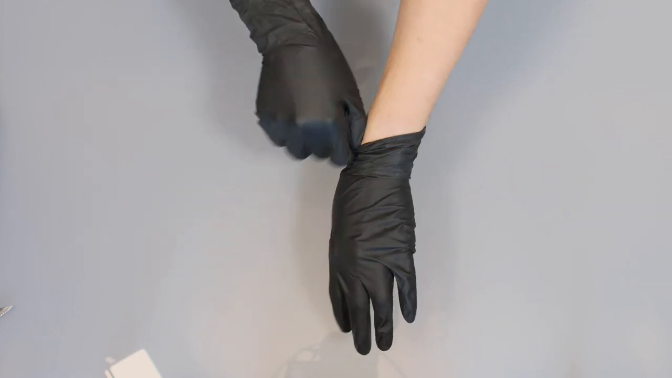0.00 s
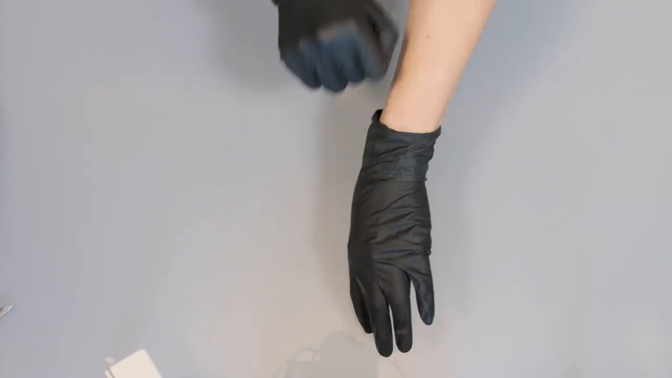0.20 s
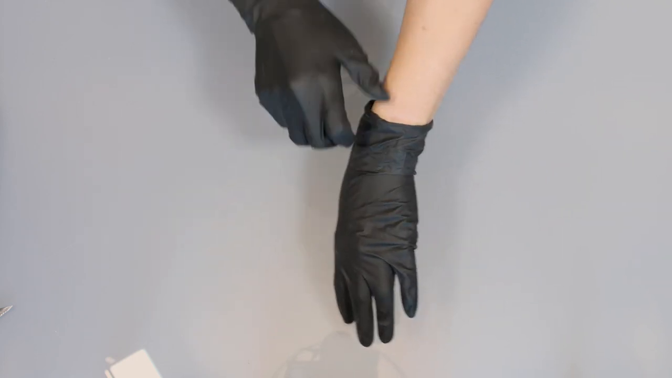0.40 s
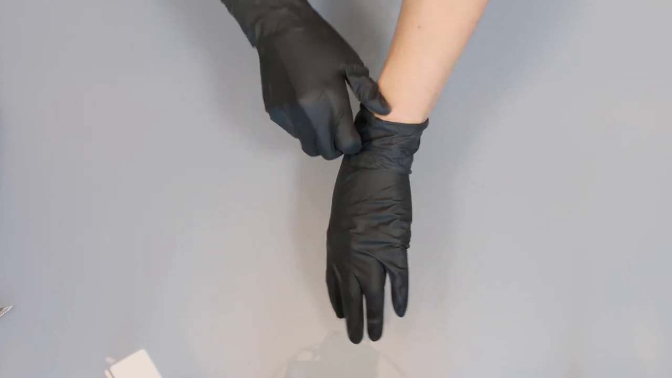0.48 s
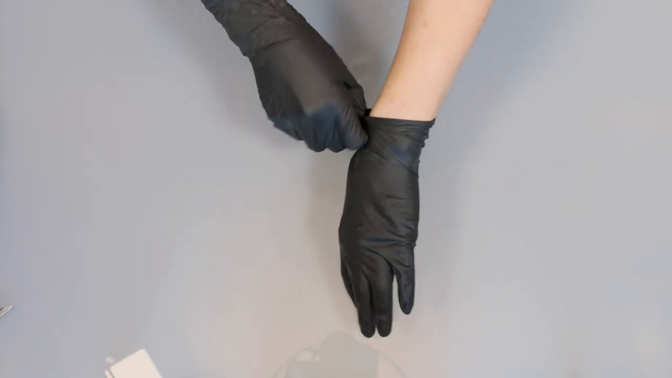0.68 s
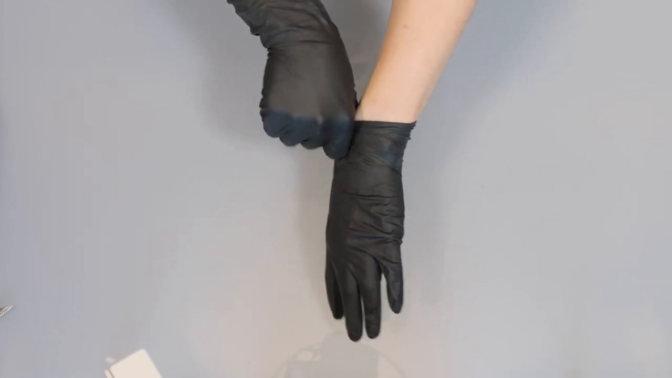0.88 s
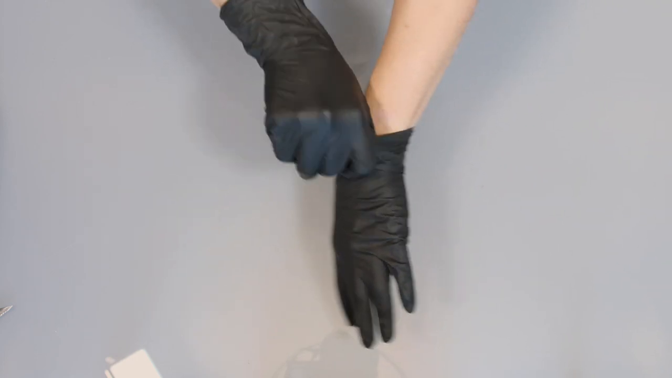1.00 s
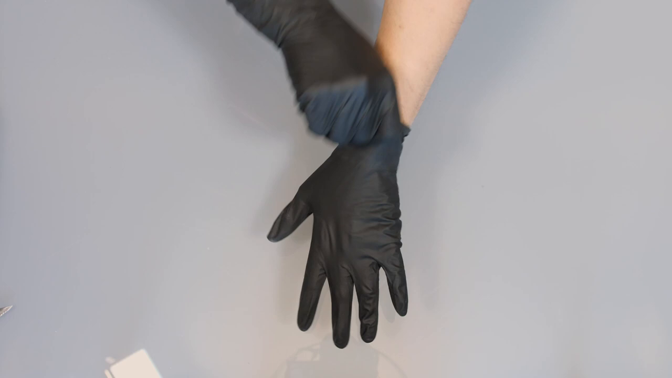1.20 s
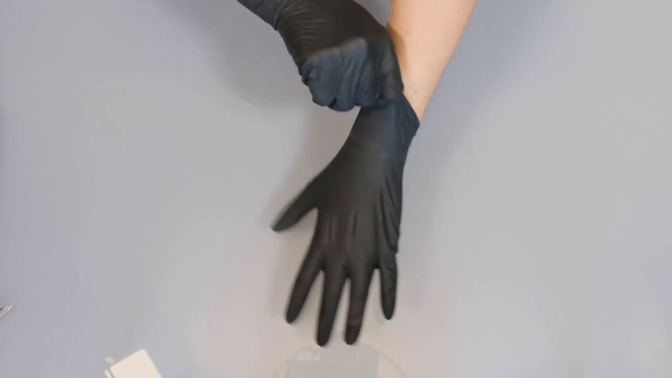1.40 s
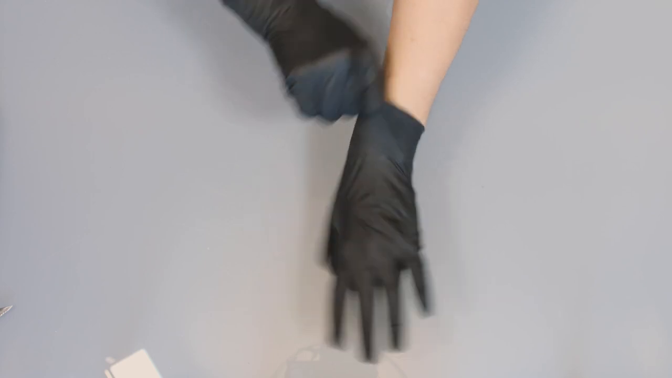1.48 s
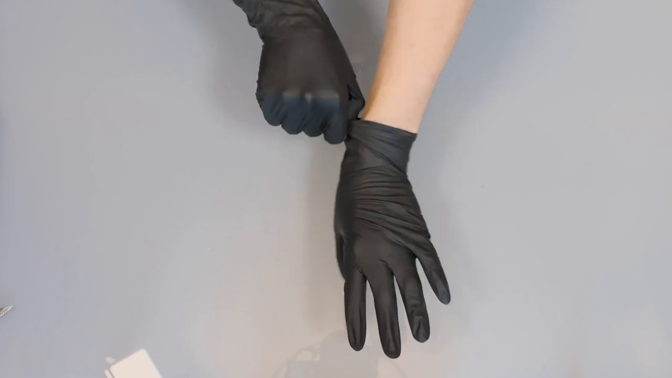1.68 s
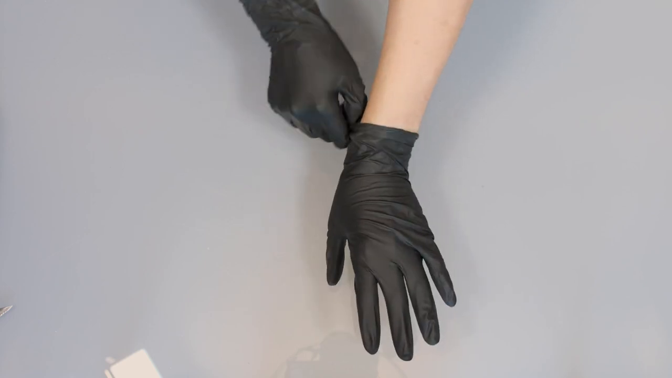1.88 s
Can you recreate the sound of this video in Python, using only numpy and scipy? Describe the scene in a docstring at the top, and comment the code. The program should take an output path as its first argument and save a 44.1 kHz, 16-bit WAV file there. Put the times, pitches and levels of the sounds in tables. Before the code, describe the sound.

Thin rubber gloves being adjusted, close and dry, nearly mono in a small quiet room. Light crinkling leads to a sharp cuff slap with a soft thump at 0.24 s. Rustling fades almost away around 0.5 s; a crisp rustle comes at 0.68. Snaps cluster at 1.02-1.13, crackles and tiny squeals peak near 1.45, a bright snap at 1.6 starts a falling rubber stutter until 1.75, then a last rustle at 1.83.

```python
"""Rubber gloves at close range

Thin rubber gloves worked over the fingers, close to a nearly mono microphone in a small room.
Noise and random clicks, shaped by spectra, make the rustling, crackling film and the room air.
Damped sines make the rest: a cuff slaps the wrist, folds snap, taut film squeals, rubber stutters
on rubber, soft bumps reach the microphone. An 18 Hz sine is its stand swaying."""
import sys
import numpy as np
from scipy import signal
from scipy.fft import rfft, irfft, next_fast_len
from scipy.io import wavfile
from scipy.ndimage import uniform_filter1d, map_coordinates

SR = 44100
rng = np.random.default_rng(int(sys.argv[2]) if len(sys.argv) > 2 else 0)


def master_out(mix):
    """Clip the mix to full scale and print it as 16-bit PCM to the path in sys.argv[1]."""
    frames = np.transpose(np.atleast_2d(mix))
    ceiling = np.clip(frames, -1, 1)
    pcm = np.round(ceiling * 32767).astype(np.int16)
    wavfile.write(sys.argv[1], SR, pcm)


def boost(x):
    """Linear amplitude factor 10**(x/20) for a level x in decibels (scalar or array-like)."""
    u = np.asarray(x, float) / 20
    return 10 ** u


N = 85995  # samples


def unit(x):
    """Scaled to rms 1."""
    return x / np.sqrt(np.mean(x ** 2) + 1e-20)


def along(points, hz):
    """Values at hz from (Hz, value) points on a log frequency axis."""
    f, v = np.transpose(points)
    return np.interp(np.log(hz + 1), np.log(f + 1), v)


def curves(rows):
    """One value per sample for each column after the time."""
    s, *columns = np.transpose(rows)
    return [np.interp(np.arange(N) / SR, s, column) for column in columns]


def wobble(rate):
    """A smooth random curve with rate knots a second."""
    knots = rng.standard_normal(int(N * rate / SR) + 4)
    return map_coordinates(knots, [np.arange(N) * rate / SR])


def coloured(x, points):
    """x filtered through a (Hz, dB) spectrum."""
    m = next_fast_len(N + 8192)
    gain = boost(along(points, np.fft.rfftfreq(m, 1 / SR)))
    return irfft(rfft(x, m) * gain, m)[:N]


def high_pass(x, hz):
    """Second-order cut of everything below hz."""
    return signal.sosfilt(signal.butter(2, hz, "high", fs=SR, output="sos"), x)


def pings(s, gain, hz, life_s, size):
    """Damped sines with a soft start, one per row; the decay falls to 1/e in life_s."""
    t = np.arange(size) / SR
    age = t / life_s[:, None]
    envelope = np.exp(-age) * (1 - np.exp(-age / 0.12))  # attack constant: 0.12 of the life
    wave = gain[:, None] * np.sin(2 * np.pi * hz[:, None] * t) * envelope
    at = np.round(s * SR).astype(int)[:, None] + np.arange(size)
    return np.bincount(at.ravel(), wave.ravel(), N + size + SR)[:N]


def crackle(count, spread_db, hiss):
    """Random tiny buckles of uneven size on a bed of friction hiss, rms 1."""
    u = rng.random((count, 3))
    at = (u[:, 0] * N).astype(int)
    size = boost(-spread_db * np.log(1.004 - u[:, 2]))
    clicks = np.bincount(at, np.sign(u[:, 1] - .5) * size, N)
    return unit(unit(clicks) + hiss * rng.standard_normal(N))


# Spectrum of the room air: f/Hz, level/dB (per Hz, relative)
AIR_SPECTRUM = [(20, 10), (90, -4.5), (300, -2.5), (2000, -9), (15000, -18), (15800, -60)]


def room_air():
    """Steady noise of the quiet room, at -64.5 dB rms."""
    return boost(-64.5) * unit(coloured(rng.standard_normal(N), AIR_SPECTRUM))


# How long the small room rings: f/Hz, t/s (fall by 60 dB)
ROOM_DECAY = [(300, 0.38), (2500, 0.42), (12000, 0.067)]


def room(x):
    """Each frequency of the answer dies at its own speed; fast random wobble roughens what feeds the tail."""
    hz, t, z = signal.stft(rng.standard_normal(SR // 2), SR, nperseg=256)
    fall = boost(-60 * t / along(ROOM_DECAY, hz)[:, None])
    tail = signal.istft(z * fall, SR, nperseg=256)[1]
    roughened = x * (1 + wobble(1200)) / np.sqrt(2)
    delayed = np.pad(roughened, (150, 0))  # samples before the walls answer
    return signal.fftconvolve(delayed, tail / np.linalg.norm(tail))[:N]


# Colouring of what differs between the channels: f/Hz, level/dB (relative)
SIDE_SPECTRUM = [(60, 2), (2500, 1.5), (6000, 2), (14000, 3.5), (15500, -15)]


def apart(mid):
    """A faint flickering hiss, opposite in the two channels, that partly follows the sound."""
    level_db, follows, flicker_db = -63, 0.49, 3.5  # rms; exponent on the sound's magnitude; depth
    z = np.abs(signal.stft(mid, nperseg=1024)[2])
    smooth = uniform_filter1d(rng.standard_normal(z.shape), size=20, axis=0)
    patches = unit(smooth + 0.52 * rng.standard_normal(z.shape[1]))
    phase = np.exp(2j * np.pi * rng.random(z.shape))
    z = z ** follows * boost(flicker_db * patches) * phase
    hiss = signal.istft(z, nperseg=1024)[1][:N]
    return boost(level_db) * unit(coloured(hiss, SIDE_SPECTRUM))


def sway():
    """The microphone stand is nudged, swings as a slow sine and settles."""
    start_s, rise_s, hold_s = .86, 0.059, 0.35
    level_db, fall_db_per_s, sway_hz = -39, 43, 18.2
    t = np.maximum(np.arange(N) / SR - start_s, 0)
    fall_db = fall_db_per_s * np.maximum(t - hold_s, 0)
    level = (1 - np.exp(-t / rise_s)) * boost(level_db - fall_db)
    return level * np.sin(2 * np.pi * sway_hz * t - 1.6)


# Soft bumps reaching the microphone: t/s, level/dB (before the smoothing), f/Hz
BUMP_HITS = [(0.166, -40, 174), (0.186, -32.5, 217), (.2388, -17.5, 298), (0.54, -42, 176),
             (0.853, -32, 217), (0.865, -36, 274), (0.899, -41.5, 171), (1.022, -37.5, 326),
             (1.262, -40.5, 113), (1.273, -39, 260), (1.305, -45, 125), (1.461, -37, 290),
             (1.598, -62, 870), (1.835, -33.5, 514)]


def bumps():
    """Low soft pushes, each a heavily damped sine with a shorter overtone."""
    s, db, hz = np.transpose(BUMP_HITS)
    life_s = 0.9 / hz  # 0.9 of a cycle
    push = pings(s, 1.9 * boost(db), hz, life_s, size=4000)
    overtone = pings(s, boost(db - 9.5), 2.06 * hz, life_s / 2, size=2000)
    return high_pass(uniform_filter1d(push + overtone, size=24), 70)


# Taut film squealing briefly: t/s, length t/s, level/dB (before a 7 dB lift and random spread), f/Hz (centre)
SQUEAL_RUNS = [(0.9005, .005, -44.5, 2090), (1.055, .011, -44, 2750), (1.443, .012, -36.5, 3390),
               (1.458, .011, -38, 3700)]


def squeals():
    """A quick run of random slips rings the stretched film at scattered pitches around a centre."""
    tries, slips_per_s, cycles = 40, 1100, 2.8  # cycles: life of each ping, at the centre pitch
    s, length, db, hz = np.repeat(np.array(SQUEAL_RUNS), repeats=tries, axis=0).T
    u = rng.random((len(s), 4))
    heard = u[:, 3] < slips_per_s * length / tries
    gain = heard * boost(db + 8.2 * u[:, 1] + 7)
    pitch_hz = hz * (1 + 0.32 * (u[:, 2] - .5))
    return pings(s + length * u[:, 0], gain, pitch_hz, cycles / hz, size=400)


# Rubber stuttering on rubber: t/s, hollow f/Hz, hollow level/dB, tick level/dB
# (levels before the lifts and random spread below)
STUTTER = [(1.39, 1300, -69.5, -76), (1.405, 1389, -48.5, -58), (1.45, 1496, -44, -52),
           (1.465, 1600, -70.5, -81), (1.598, 1150, -69, -70), (1.606, 1150, -46, -37),
           (1.635, 994, -38.5, -45.5), (1.657, 807.7, -38.5, -47), (1.675, 640, -37.5, -40.5),
           (1.70, 580.6, -39, -61), (1.72, 514, -40.5, -41), (1.755, 520, -65.5, -85)]


def squeak():
    """Uneven slips keep the gliding hollow of the glove ringing and tick near 2.6 kHz and above."""
    slips_per_s, tick_s, hollow_s = 345, .0003, .002  # lives of a high tick and of the hollow's ring
    palm_hz, waver = 450, .12  # a low note that wakes as the hollow sinks; both waver in pitch
    hollow_hz, hollow_db, tick_db = curves(STUTTER)
    slips = np.cumsum(slips_per_s * (1 + .16 * wobble(140))) / SR
    at = np.flatnonzero(np.diff(np.floor(slips)))
    at = at[hollow_db[at] > -69]
    u, s, life_s = rng.standard_normal((len(at), 4)), at / SR, np.full(len(at), tick_s)

    kicks = np.bincount(at, boost(hollow_db[at] + 4 + 3.7 * u[:, 0]), N)
    kicks = signal.lfilter([1], [1, -np.exp(-1 / SR / hollow_s)], kicks)
    hollow = np.sin(2 * np.pi * np.cumsum(hollow_hz * (1 + waver * wobble(300))) / SR)
    palm = np.sin(2 * np.pi * np.cumsum(palm_hz * (1 + waver * wobble(150))) / SR)
    rung = uniform_filter1d(kicks, size=24) * (hollow + palm_hz / hollow_hz * palm)

    tick = boost(tick_db[at] + 13.5 + 2 * u[:, 2])
    low = pings(s, tick, 2600 * (1 + 0.054 * u[:, 3]), 2 * life_s, size=200)
    high = pings(s, tick, 5200 * np.exp(0.34 * u[:, 1]), life_s, size=200)
    return high_pass(rung, 260) + low + high


# The cuff lands on the wrist in quick flaps: t/s, level/dB
FLAPS = [(.2389, -6.5), (.2411, -11), (.2424, -17.5), (.2439, -19)]
# Modes of the cuff: f/Hz, level/dB (added to the flap's), t/s (fall by 60 dB)
CUFF_MODES = [(800, -13, 0.0037), (1150, -10, 0.013), (1550, -9.5, 0.012), (2700, -0.5, 0.006),
              (3570, -2.5, 0.014), (5160, 1, 0.0024)]


def slap():
    """Every flap of the cuff rings the same short modes under a dry smack of noise."""
    smack_db, smack_s = -8, 0.0022  # relative to the flap; fall to 1/e
    rows = np.array([(s, db + level, hz, t60 / np.log(1000))
                     for s, db in FLAPS for hz, level, t60 in CUFF_MODES])
    s, db, hz, life_s = rows.T
    u, t = rng.standard_normal((len(rows), 2)), np.arange(N) / SR
    smack = sum(boost(level + smack_db) * (t >= at) * np.exp(-np.abs(t - at) / smack_s)
                for at, level in FLAPS)
    ring = pings(s + .0001 * u[:, 0], boost(db + u[:, 1]), hz, life_s, size=1200)
    return ring + smack * uniform_filter1d(rng.standard_normal(N), size=3)


# Folds snapping: t/s, level/dB (before the ping and crack gains), f/Hz
FOLDS = [(0.1563, -31, 8000), (0.1844, -20.5, 6400), (0.1863, -29, 2600), (0.1903, -30.5, 1330),
         (0.22, -33, 2900), (0.2326, -34, 4200), (0.538, -32, 6000), (0.5431, -31.5, 4230),
         (0.678, -20, 4460), (0.8212, -29, 2800), (1.0234, -30, 2600), (1.0334, -23.5, 3350),
         (1.0542, -24, 2700), (1.0702, -29.5, 1550), (1.074, -25, 2720), (1.0802, -25, 2940),
         (1.0869, -21, 2700), (1.0933, -17, 3000), (1.0992, -20.5, 2700), (1.1099, -43, 2200),
         (1.1275, -25.5, 5550), (1.139, -34, 1500), (1.2067, -21, 7760), (1.245, -33.5, 1630),
         (1.2791, -23.5, 2850), (1.3018, -24.5, 7300), (1.3704, -25, 2700), (1.3855, -37.5, 1140),
         (1.4568, -15.5, 3180), (1.4687, -31, 3280), (1.5565, -28.5, 1220), (1.5988, -10.5, 7700),
         (1.7594, -28, 5100)]


def snaps():
    """Each fold pops: a few cycles at its pitch and a dry crack of noise."""
    s, db, hz = np.transpose(FOLDS)
    t = np.arange(256) / SR
    decay = np.exp(-t / 0.00055)
    crack = np.zeros(N + len(t))
    noises = rng.standard_normal((len(s), len(t)))
    for at, gain, noise in zip(np.round(s * SR).astype(int), boost(db), noises):
        crack[at:at + len(t)] += gain * noise * decay
    pop = pings(s, 1.63 * boost(db), hz, 1.05 / hz, size=400)  # life: 1.05 cycles
    return pop + 0.21 * uniform_filter1d(crack[:N], size=3)


# Hands at work in the gloves: t/s, effort level/dB,
# tautness level/dB (stretched film over rustle, before the trims below)
HANDLING = [(0, -49, -4.5), (0.09, -49, 0.5), (0.125, -58.5, -1.5), (0.15, -50.5, -2), (0.165, -39, -3),
            (0.195, -46, 3), (0.225, -52, 5.5), (0.25, -38, 0), (0.3, -51.5, -6), (0.35, -62.5, 4),
            (0.4, -49, -2), (0.46, -64.5, 12.5), (0.5, -75.5, 8.5), (0.525, -65.5, 3), (0.545, -48, 0.5),
            (0.58, -56.5, 3), (0.63, -50.5, -3), (0.675, -40.5, -6.5), (0.735, -47, -4), (0.83, -55.5, 8),
            (0.88, -58.5, 6), (0.96, -60, 3), (1.0, -48.5, 4.5), (1.055, -43.5, 6), (1.12, -46.5, 5.5),
            (1.175, -55, -3.5), (1.25, -41.5, -0.5), (1.28, -41.5, -5.5), (1.31, -46, 6), (1.35, -51.5, 0),
            (1.41, -50, 1.5), (1.435, -43, -4), (1.455, -39.5, 1.5), (1.485, -49.5, 5.5), (1.56, -41, -4.5),
            (1.62, -47.5, 4.5), (1.72, -44.5, -2), (1.765, -54, -0.5), (1.83, -39, -7.5), (1.95, -53.5, -9)]
# Spectra of the loose film, the stretched film and the dull rub: f/Hz, level/dB (per Hz, relative)
RUSTLE_SPECTRUM = [(900, -6), (1500, -10), (2700, -6.5), (3400, -3), (7700, 1), (9300, -2), (10500, -11.5),
                   (13200, -4), (15300, -14.5), (15800, -68)]
TAUT_SPECTRUM = [(900, -42), (1500, -4.5), (2200, -1.5), (2800, 0), (3500, -2), (4500, -4.5), (6500, -23)]
DRAG_SPECTRUM = [(20, -5), (60, -3.5), (150, -1.5), (400, 2.5), (900, -6), (1500, -0.5), (2500, -44)]


def film():
    """Effort drives the rustle; tautness adds a ring near 3 kHz and a dull drag."""
    effort_db, taut_db = curves(HANDLING)
    rustle = unit(coloured(crackle(count=9000, spread_db=3.5, hiss=0.7), RUSTLE_SPECTRUM))
    rustle = rustle * boost(wobble(90))
    taut = unit(coloured(crackle(count=5000, spread_db=4, hiss=0.71), TAUT_SPECTRUM))
    taut = taut * boost(taut_db - 5.0 + 2.3 * wobble(90))
    drag = unit(coloured(crackle(count=900, spread_db=4.0, hiss=0.95), DRAG_SPECTRUM))
    drag = drag * boost(taut_db - 8.5 + 1.1 * wobble(40.47))
    return boost(effort_db) * (rustle + taut + drag)


def scene():
    """All sources sit in the middle; only a faint hiss differs between the channels."""
    hits = bumps() + squeals() + squeak() + slap() + snaps()
    mid = room_air() + boost(-14.5) * room(hits) + hits + film()
    side = apart(mid)
    return np.array([mid + side, mid - side]) + sway()


def top_cut(x):
    """Nothing passes above the cut-off."""
    return signal.sosfilt(signal.butter(12, 16650, fs=SR, output="sos"), x)


def record(dry):
    """A steep low-pass at 16.2 kHz limits the band of the finished mix."""
    mix = signal.sosfilt(signal.butter(10, 16200, fs=SR, output="sos"), dry)
    return top_cut(mix)


dry = scene()
out = record(dry)
master_out(out)
```